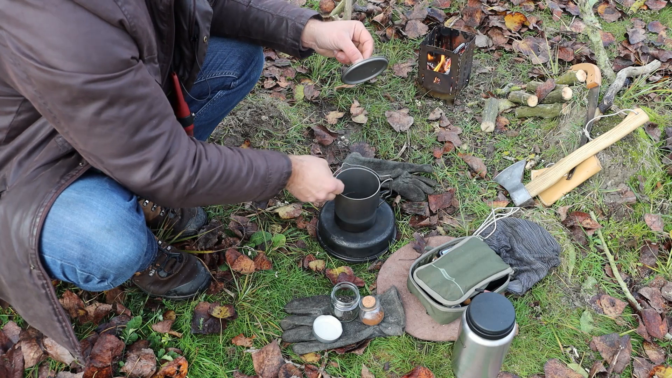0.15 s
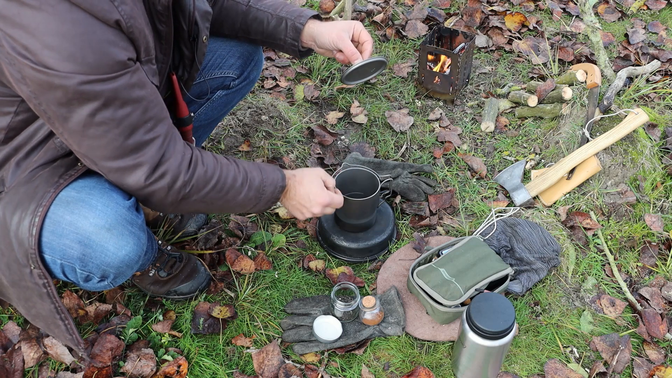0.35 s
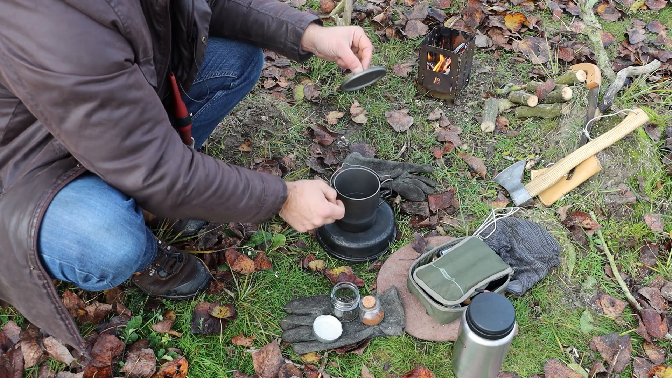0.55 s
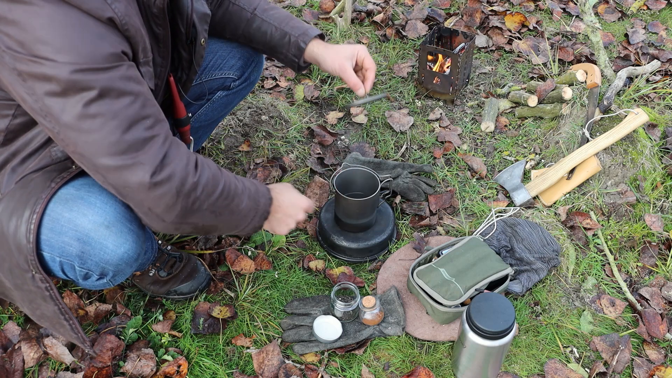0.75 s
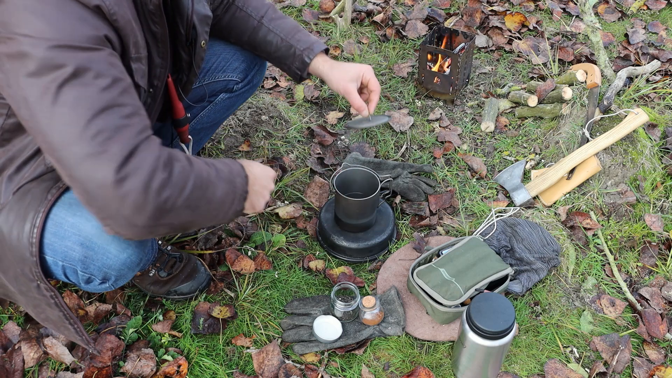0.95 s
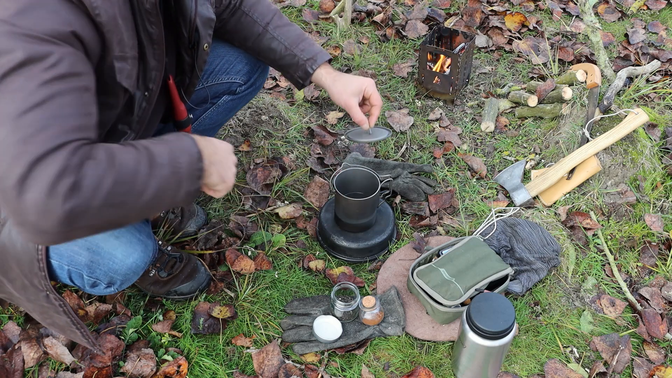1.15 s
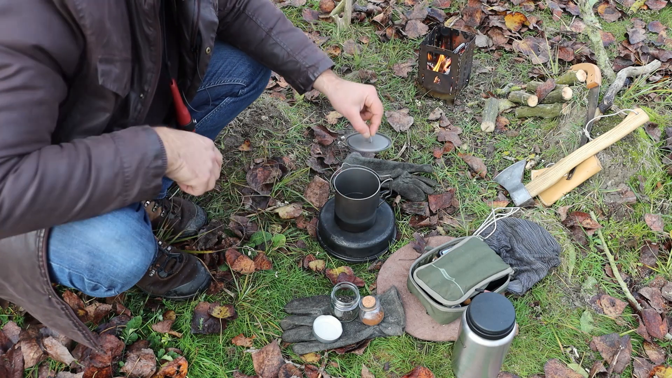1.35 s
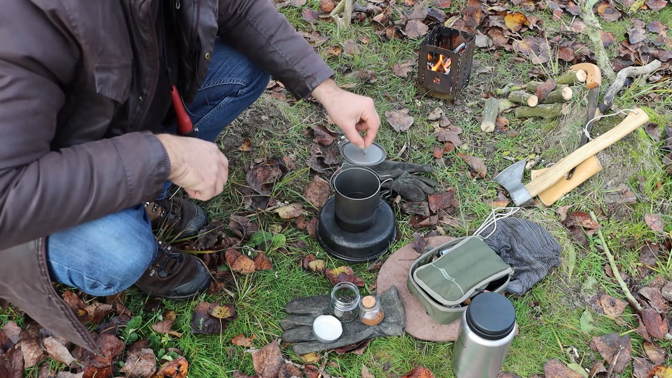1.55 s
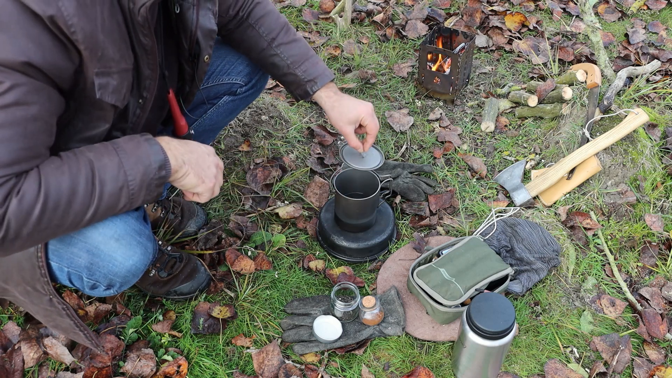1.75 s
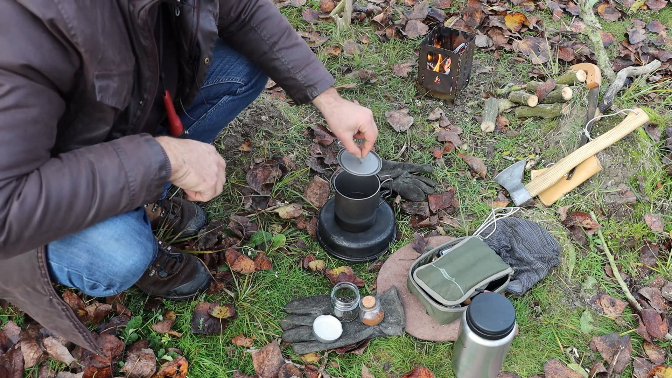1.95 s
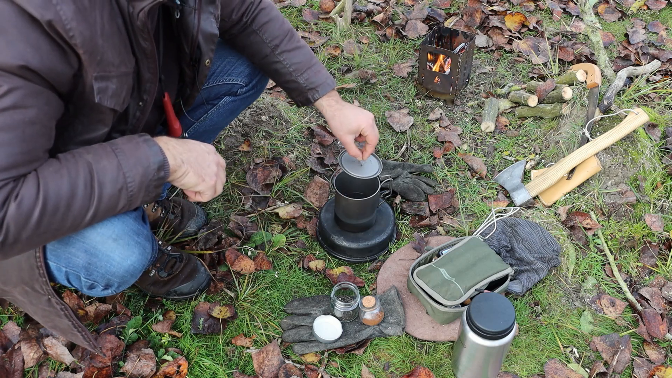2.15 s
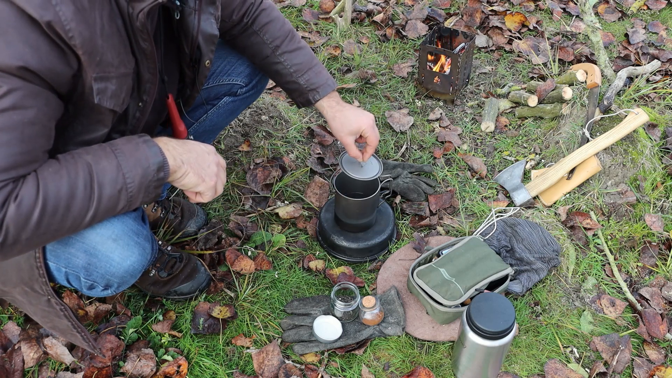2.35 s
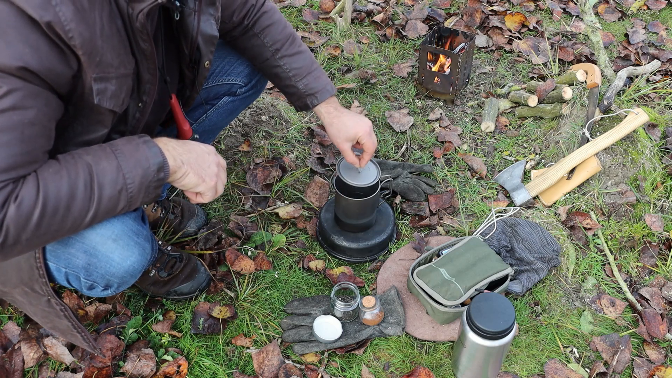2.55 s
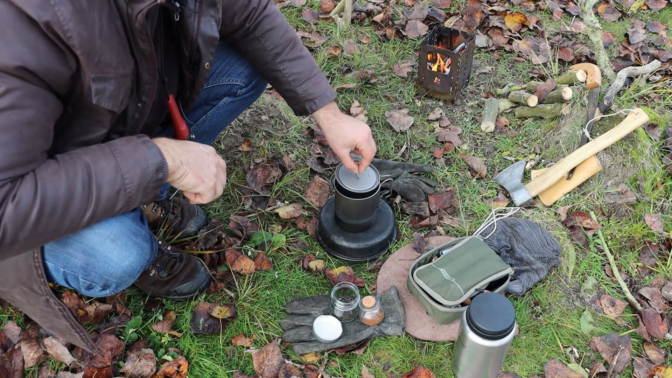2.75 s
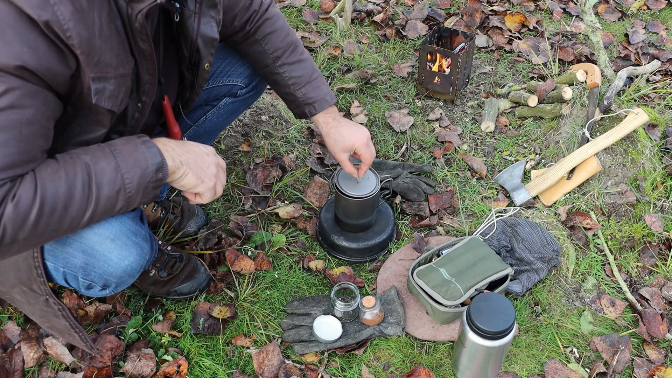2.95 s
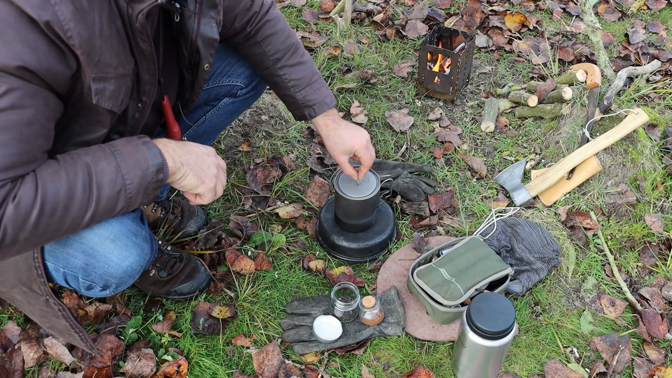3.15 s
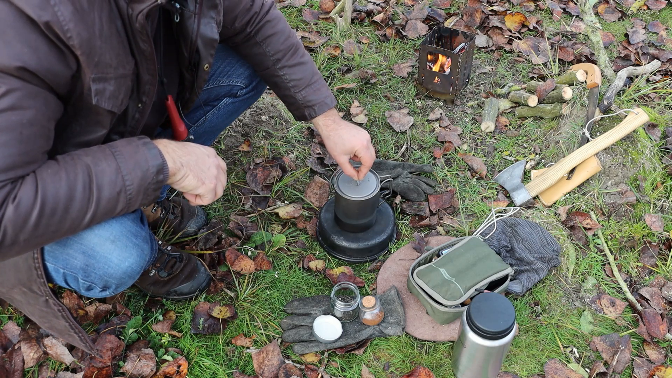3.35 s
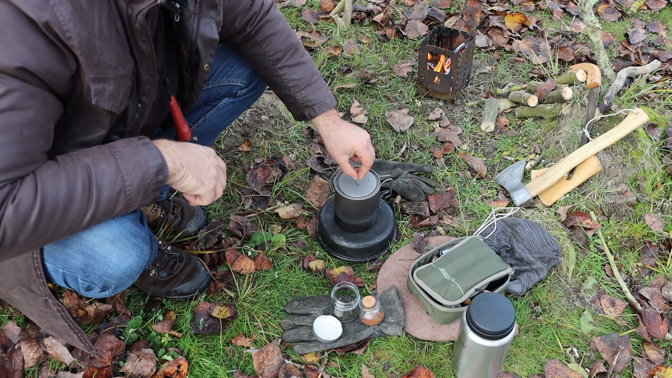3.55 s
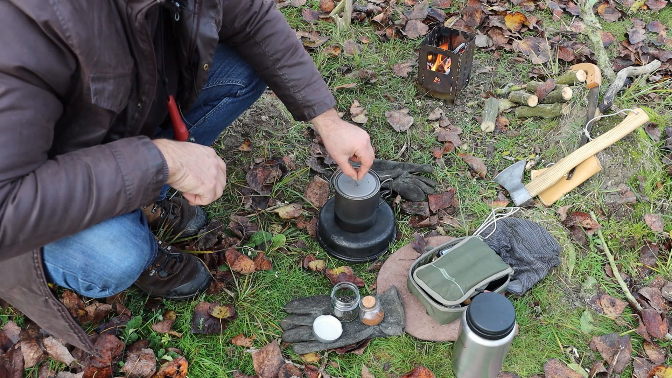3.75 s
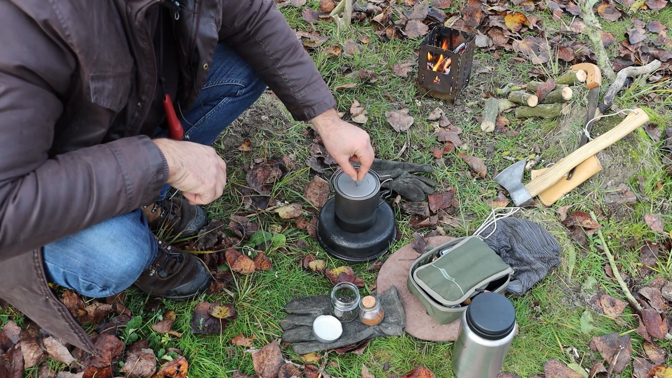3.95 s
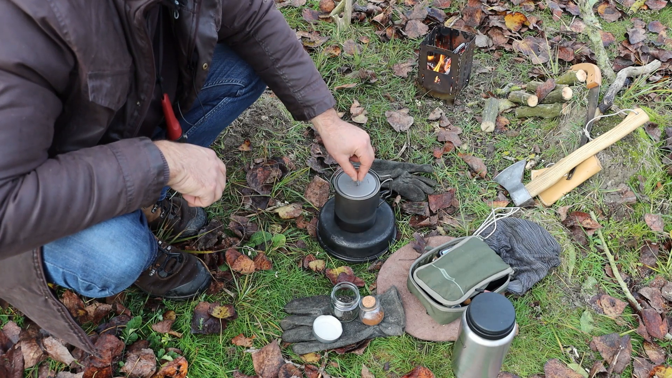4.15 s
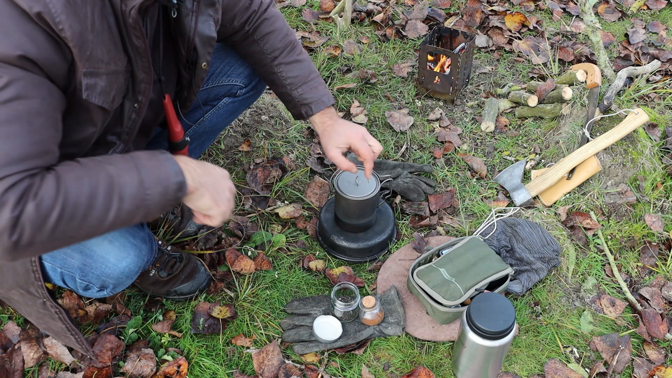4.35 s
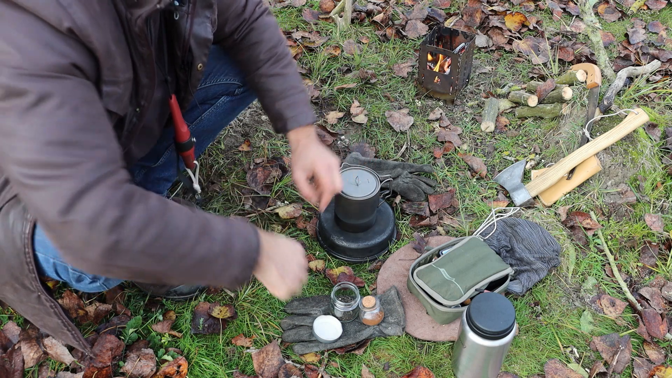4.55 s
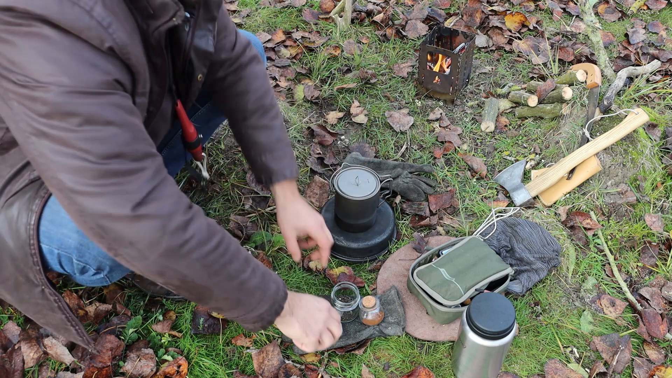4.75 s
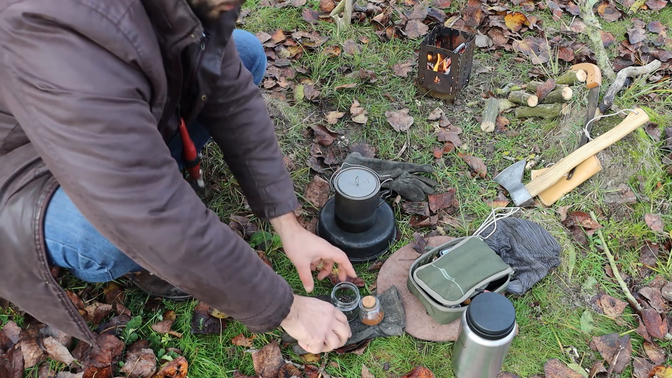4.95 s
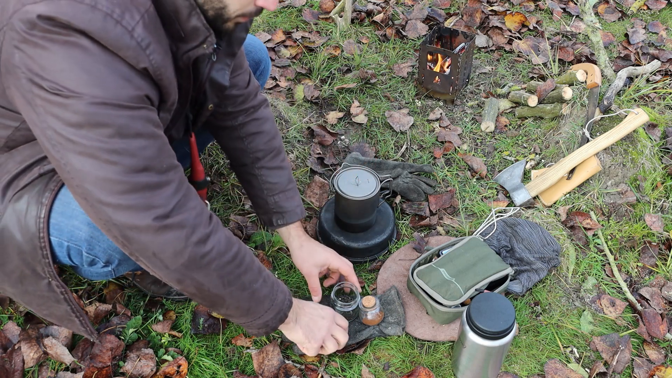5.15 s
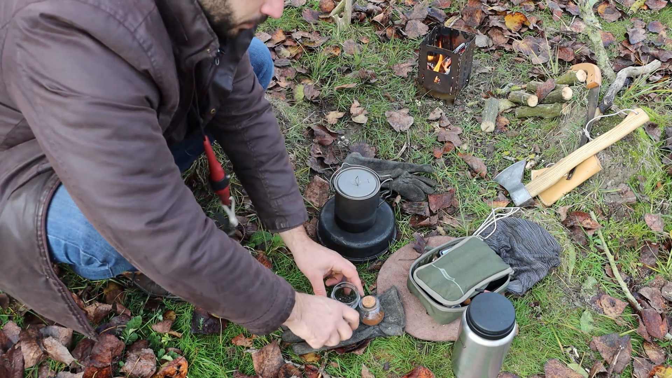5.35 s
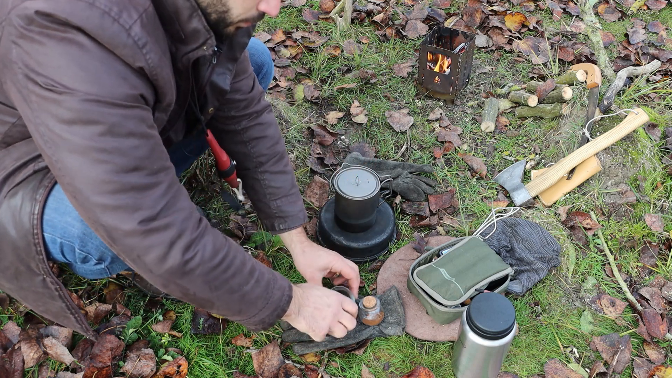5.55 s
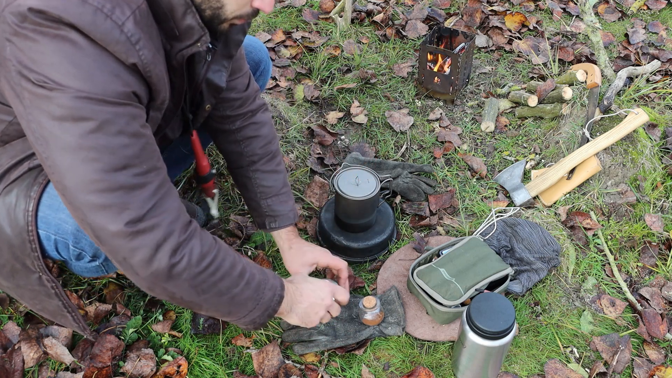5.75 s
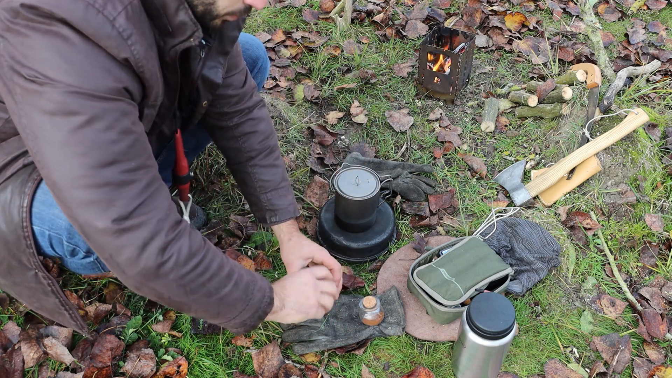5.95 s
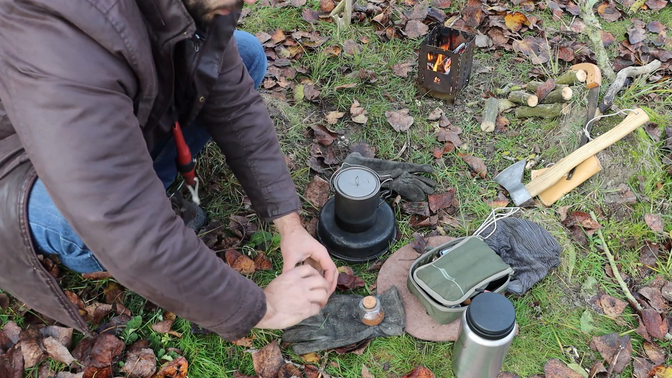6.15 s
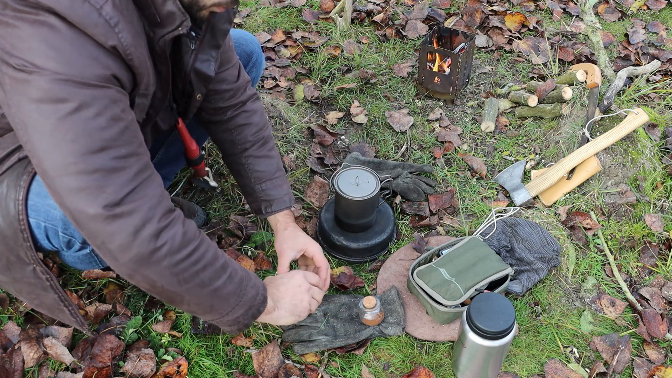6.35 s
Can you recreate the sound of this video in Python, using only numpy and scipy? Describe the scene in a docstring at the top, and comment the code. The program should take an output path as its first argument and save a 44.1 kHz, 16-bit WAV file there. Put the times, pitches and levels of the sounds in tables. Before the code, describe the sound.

Beside a small wood stove, a metal mug rattles briefly into place near the microphone. Leather-like sleeves rub softly, then there is a quiet gap before the metal lid rings and chatters on the rim in small groups. Sleeves swish again, with a soft cloth pat and a tiny fire tick. Finally a glass jar clinks sharply and its threaded cap turns with hollow, gritty scrapes and hard clicks. Faint birds and traffic remain far away.

```python
"""Mug, lid and jar by a wood stove

Outdoors by a small wood stove: near the microphone a thin metal mug is slid onto its stand, its lid is
fitted on the rim, then a glass jar is picked up and its cap twisted. Contacts are bursts of tiny bounces
that ring each object's modes; the turning thread is gritty noise through moving resonances.
Jacket sleeves swish as shaped noise, a bird ticks in pairs of falling tones, the fire snaps twice
as short bright bursts, and far traffic hums under it all as filtered noise."""
import sys
import numpy as np
from scipy import signal
from scipy.io import wavfile
from scipy.ndimage import uniform_filter1d

SR = 44100
rng = np.random.default_rng(int(sys.argv[2]) if len(sys.argv) > 2 else 0)


def materialize(psi):
    """Save the field psi as 16-bit PCM at rate SR to the path in sys.argv[1].

    A 1-D psi becomes a single channel; in a 2-D psi each row is a channel.
    """
    bounded = np.clip(np.atleast_2d(psi).T, -1, 1)
    quanta = np.round(bounded * 32767).astype(np.int16)
    wavfile.write(sys.argv[1], SR, quanta)


N = 282356  # length of the scene [samples]


def amp(db):
    """Amplitude factor for a level in dB."""
    return 10 ** (np.asarray(db) / 20)


def evened(x):
    """The signal scaled to an RMS of 1."""
    return x / np.sqrt(np.mean(x ** 2) + 1e-20)


def add(mix, s, sound):
    """Lay a sound into the mix from s seconds on."""
    part = mix[round(s * SR):][:len(sound)]
    part += sound[:len(part)]


def small(x, bass_hz):
    """Small objects radiate little bass."""
    return signal.sosfilt(signal.butter(4, bass_hz, "high", fs=SR, output="sos"), x)


def resonate(x, hz, width):
    """A resonance of gain 1 that follows the curve hz: shift it to 0 Hz, smooth, shift back."""
    turn = np.exp(2j * np.pi * np.cumsum(hz * np.ones(len(x))) / SR)
    r = np.exp(-np.pi * width / SR)
    return 2 * (turn * signal.lfilter([1 - r], [1, -r], x / turn)).real


def noise(points, tilt_db, patchy_db):
    """Random short-time spectra of unit power with drifting patches; tilt_db turns them about 2 kHz."""
    frames, hz = N // 128 + 5, np.fft.rfftfreq(512, 1 / SR) + 1
    a, b, patches = rng.standard_normal((frames, 257, 3)).T
    patches = uniform_filter1d(patches, size=6, axis=0)  # smooth over frequency
    patches = evened(uniform_filter1d(patches, size=10, axis=1))  # and over time
    f, db = np.transpose(points)
    tilt_db = np.interp(np.arange(frames) * 128, np.arange(N), tilt_db * np.ones(N))
    octaves = np.log2(hz / 2000).clip(-2)
    shape = amp(np.interp(np.log(hz), np.log(f), db)[:, None] + octaves[:, None] * tilt_db)
    shape /= np.linalg.norm(shape, axis=0)
    spectra = (a + 1j * b) * shape * amp(patchy_db * patches)
    return evened(signal.istft(spectra, nperseg=512, noverlap=384)[1][:N])


def grit(count, uneven_db):
    """Noise made of many tiny slips, a few of them large."""
    slips = amp(uneven_db * np.minimum(rng.exponential(1, count), 5))
    return evened(slips * rng.standard_normal(count))


def strike(modes_at, blows, spot_db, bass_hz, reach=4, detune=0, uneven_db=1.3, slide_s=0.013):
    """Each contact is a click and a swell of tiny bounces that ring the modes; its spot shifts their balance."""
    build_cycles = 0.51  # time constant of each mode's build-up, in its own cycles
    t, out = np.arange(10000) / SR, np.zeros(N)
    for s, peak_db, hard_db, length, *grip_hz in blows:
        hz, width, db = np.transpose(modes_at(s))[:, :, None]
        spot, bend = rng.standard_normal((2, len(hz), 1))
        hz = hz * (1 + detune * bend)  # the grip bends a thin wall
        # a hard contact brightens up to reach octaves above 1 kHz
        octaves = np.minimum(np.log2(hz / 1000), reach if hard_db > 0 else np.inf)
        strength = width * amp(db + hard_db * octaves + spot_db * spot)
        decay = np.exp(-np.pi * (width + abs(sum(grip_hz))) * t)
        rings = strength * decay * np.sin(2 * np.pi * hz * t)
        rings *= 1 - np.exp(-hz * t / build_cycles)
        ring = rings[::2].sum(0) - rings[1::2].sum(0)  # neighbouring modes start in opposite sense
        u = t / max(length, 1e-4)
        bounces = 0.1 * grit(len(t), uneven_db) * u * np.exp(1 - u)
        bounces[0] = np.exp(-length / slide_s)  # a long slide starts softly
        sound = small(signal.fftconvolve(bounces, ring), bass_hz)
        add(out, s, amp(peak_db) * sound / abs(sound).max())
    return out


# Spectrum of the far traffic and air: (frequency [Hz], relative power per Hz [dB])
AIR_SPECTRUM = [(20, -24), (120, -1.5), (205, -12), (322, -5.5), (960, -9), (1940, -29.5), (15000, -27.5),
                (16300, -58)]
# The low hum under it: (time [s], RMS level [dB])
HUM_LEVEL = [(0, -59.5), (2.1, -61), (6.4, -64.5)]


def background():
    """Far traffic and air as patchy noise, with a low hum that wavers: noise in a narrow resonance."""
    air = amp(-52) * noise(AIR_SPECTRUM, 0, patchy_db=2.5)
    hum = evened(resonate(rng.standard_normal(N), 109.2, 30.0))
    return air + hum * amp(np.interp(np.arange(N) / SR, *np.transpose(HUM_LEVEL)))


# Pairs of bird ticks, before the echoes: (time of the first [s], peak level [dB], gap to the second [s])
BIRD_TICKS = [(0.959, -44, 0.042), (1.768, -45.5, 0.043), (2.927, -43, 0.033), (3.728, -43, 0.039),
              (4.894, -46, 0.039), (5.124, -45, 0.047)]


def bird():
    """Each note drops steeply in pitch, the second over a narrower range; the trunks return close echoes."""
    out, u = np.zeros(N), np.linspace(0, 1, 400)
    for s, peak_db, gap in BIRD_TICKS:
        for start, top_hz, end_hz in (s, 8200.0, 5000.0), (s + gap, 7000.0, 4700.0):
            hz = top_hz + (end_hz - top_hz) * u
            swell = np.sin(np.pi * u) ** 0.74
            add(out, start, amp(peak_db) * swell * np.sin(2 * np.pi * np.cumsum(hz) / SR))
    t = np.arange(4000) / SR
    sparse = (rng.random(4000) < 0.1) * rng.standard_normal(4000)
    echoes = 0.24 * sparse * np.exp(-t / 0.009)
    echoes[[0, 230]] = 1, 0.45  # the direct note, then one clear echo 5 ms later
    return signal.oaconvolve(out, echoes)[:N]


# Snaps of the stove fire: (time [s], peak level [dB], decay time [s], bass cutoff [Hz])
FIRE_SNAPS = [(0.403, -14, 0.0012, 400), (4.631, -24.5, 0.001, 5000)]


def fire():
    """Pockets in the wood burst: a click and a short decaying burst of noise."""
    out, t = np.zeros(N), np.arange(400) / SR
    for s, peak_db, decay_s, low_hz in FIRE_SNAPS:
        burst = 0.2 * rng.standard_normal(400) * np.exp(-t / decay_s)
        burst[0] = 1
        burst = small(uniform_filter1d(burst, size=3, origin=1), low_hz)
        add(out, s, amp(peak_db) * burst / abs(burst).max())
    return out


# Spectrum of cloth on cloth, before the brightness tilt: (frequency [Hz], relative power per Hz [dB])
CLOTH_SPECTRUM = [(100, -14.5), (662, 0.5), (872, 1.5), (1230, -2), (3500, -15), (4300, -22.5),
                  (13800, -51), (16000, -60)]
# Sleeve strokes: (time when fastest [s], rise [s], fall [s], level before flicker [dB],
# brightness [dB per octave], hollow of the fold when fastest [Hz])
SLEEVE_STROKES = [(.83, 0.48, 0.44, -30.5, 5.5, 940), (1.17, 0.19, 0.4, -42, 7.5, 950),
                  (1.392, 0.36, 0.2, -37, 7, 1000), (4.491, 0.44, 0.68, -34.5, 7.5, 850),
                  (4.74, 0.51, 0.76, -34, 4, 1200)]
# The jacket's faint rustle between strokes: (time [s], level before flicker [dB])
REST_RUSTLE = [(0, -52.5), (1.5, -51), (2.3, -59.5), (2.95, -57), (3.9, -49.5), (4.2, -58.5), (5.05, -49.5),
               (5.4, -55), (6.4, -55.5)]


def sleeves():
    """Cloth rubs on cloth; the fold between arm and chest adds a hollow band that differs by reach."""
    drop_db = 83  # below the top at either end of a stroke
    sag_hz_per_s = 700  # the fold opens and its hollow sinks through a stroke
    rest_bright_db, rest_hollow_hz = 7.5, 960  # [dB per octave], [Hz]
    t = np.arange(N) / SR
    s, rise, fall, top_db, bright_db, hollow_hz = np.transpose(SLEEVE_STROKES)[:, :, None]
    strokes_db = top_db - drop_db * ((t - s) / np.where(t < s, rise, fall)) ** 2
    rest_db = np.interp(t, *np.transpose(REST_RUSTLE))
    power = amp(2 * np.vstack([strokes_db.clip(-200), rest_db]))
    share = power / power.sum(0)  # the strongest rub sets brightness and hollow
    rub = noise(CLOTH_SPECTRUM, np.append(bright_db, rest_bright_db) @ share, patchy_db=1.5)
    sinking_hz = hollow_hz - sag_hz_per_s * (t - s).clip(-0.1, fall)
    fold_hz = (share * np.vstack([sinking_hz, np.full(N, rest_hollow_hz)])).sum(0)
    rub = evened(rub + 1.23 * resonate(rub, fold_hz, 155.0))
    flicker = evened(uniform_filter1d(rng.standard_normal(N), size=200))
    return rub * np.sqrt(power.sum(0)) * amp(1.1 * flicker)


# Small pats of cloth: (time [s], top of the envelope [dB], tone [Hz])
CLOTH_PATS = [(1.297, -39, 350), (4.58, -29.5, 1770)]


def pats():
    """A fold of the jacket slaps shut with a soft, short tone."""
    out, t = np.zeros(N), np.arange(3000) / SR
    u = t / 0.0045  # the envelope peaks after 4.5 ms
    for s, peak_db, hz in CLOTH_PATS:
        add(out, s, amp(peak_db) * u * np.exp(1 - u) * np.sin(2 * np.pi * hz * t))
    return out


# Modes of the thin metal mug, the wide ones dense and merged; strength is before hardness and spot,
# frequency before the bend of the wall: (frequency [Hz], width [Hz], strength [dB])
MUG_MODES = [(278, 180, -9), (534, 113, -2), (790, 35, 4), (1010, 120, -1), (1270, 89, 0), (2042, 84, 4.5),
             (2585, 55, 8.5), (2982, 25, 7.5), (3570, 39, 4.5), (5030, 220, 5.5), (5940, 110, 0.5),
             (10100, 45, -8), (12700, 33, -17), (14800, 83, -14), (4070, 3700, -9), (11800, 5700, -11.5)]
# Mug against its stand: (time [s], peak level [dB], hardness [dB per octave], chatter time [s])
MUG_CONTACTS = [(0.093, -28.5, 6, 0.0049), (0.1147, -17.5, 6, 0.011), (0.153, -23, -10, 0.0065),
                (0.1692, -18.5, 13, 0.021), (0.175, -23, -10, 0.0052), (0.199, -13.5, -2.5, 0.01),
                (0.237, -18.5, -7.5, 0.015), (0.2543, -11, -8, 0.003), (0.3314, -19.5, -8.5, 0.0027),
                (.345, -26, -10.5, 0.0073), (0.411, -34.5, -13.5, 0.041)]


def mug():
    """The mug knocks and slides onto its stand; its thin wall bends, so pitches vary by contact."""
    return strike(lambda at: MUG_MODES, MUG_CONTACTS, spot_db=2.5, bass_hz=280, detune=0.0208, uneven_db=2.5)


# Steady modes of the lid, before hardness and spot: (frequency [Hz], width [Hz], strength [dB])
LID_MODES = [(316, 140, -5), (570, 78, -8), (1026, 215, 0.5), (2080, 21, -4), (11400, 6700, -33.5),
             (4900, 26, -13), (5234, 63, -3.5), (6140, 27, -6), (7870, 17, -12), (2530, 2200, -8)]
# Rings that change as the lid seats: (frequency [Hz], width [Hz], tilted strength [dB], seated strength [dB])
LID_SEATING_RINGS = [(830, 70, 5, -6), (1290, 22, -4, 0), (3055, 29, 9, 8), (3547, 28, 15, -4),
                     (9105, 5, -24, -10), (1486, 9, 6, -4), (2196, 4.5, -6, 8), (2519, 7, 0, -2),
                     (2760, 8, 3, 3), (3345, 7, 5, -14), (3591, 4, -14, 9), (3671, 7, 7, -12),
                     (5098, 2, 10, -18)]


def lid_modes(at):
    """The lid's modes at one moment of its way down onto the rim."""
    tilted_s, seated_s = 3.05, 3.2
    seating = [(hz, width, np.interp(at, [tilted_s, seated_s], db)) for hz, width, *db in LID_SEATING_RINGS]
    return LID_MODES + seating


# Lid against the rim: (time [s], peak level [dB], hardness [dB per octave], chatter time [s],
# damping added by the rim or fingers [Hz])
LID_CONTACTS = [(3.003, -13.5, -1.5, 0.00083, 0.43), (3.008, -25, -3.5, 0.0026, 0.75),
                (3.1152, -19, -2.5, 0.0025, 5.3), (3.124, -24.5, -3.5, 0.013, 6.2),
                (3.181, -26.5, -3.5, 0.004, 19), (3.2084, -23.5, -5, 0.0039, 11),
                (3.228, -27, -2, 0.0051, 24), (3.517, -25.5, -4.5, 0.0036, 19),
                (3.536, -27, -5, 0.0029, 19), (3.58, -25.5, -2.5, 0.0098, 39), (3.653, -31, -5, 0.0019, 35),
                (3.669, -29, -5, 0.015, 59), (3.693, -26, 3, 0.0072, 9.5), (3.7816, -17.5, -2, 0.0015, 6.6),
                (3.7954, -13.5, 2, 0.00041, 16), (3.799, -15.5, -1.5, 0.0056, 180),
                (3.823, -21.5, -6, 0.011, 27), (3.841, -12, 1, 0.0067, 35), (3.856, -16, -2.5, 0.001, 1),
                (4.277, -35, 3, 0.0014, 9.2), (4.306, -25.5, -3, 0.0022, 11)]


def lid():
    """The lid taps and settles on the rim, which changes the balance of its rings."""
    return strike(lid_modes, LID_CONTACTS, spot_db=2.27, bass_hz=283, uneven_db=3.5, slide_s=0.0064)


# Modes of the glass body, before hardness and spot: (frequency [Hz], width [Hz], strength [dB])
GLASS_MODES = [(790, 440, -11.5), (1150, 78, 5), (1940, 78, 1.5), (2253, 76, 2.5), (2820, 75, 1.5),
               (3535, 88, -0.5), (3850, 59, -12.5), (14860, 45, -29), (5550, 410, -21.5), (9900, 5300, -36)]
# Clinks of the jar: (time [s], peak level [dB], hardness [dB per octave], chatter time [s],
# damping added by the fingers [Hz], strength of the long ring [dB])
JAR_CLINKS = [(5.355, -23, 4, 0.00074, 1, 16.5), (5.492, -6, -1, 0.00098, 3.3, 3.5),
              (5.547, -30, -3, 0.0011, 110, -7), (5.568, -37, 45, 0.0023, 1., -30),
              (6.121, -14.5, 7.5, 0.0031, 140, 15)]


def glass_modes(at):
    """The glass body and its one long ring, which each clink wakes by its own amount."""
    clinks = np.transpose(JAR_CLINKS)
    return GLASS_MODES + [(4828, 15, np.interp(at, clinks[0], clinks[-1]))]


def glass_clinks():
    """The glass jar clinks in the hand, its modes damped by the fingers."""
    return strike(glass_modes, np.array(JAR_CLINKS)[:, :-1], spot_db=1.5, bass_hz=480)


JAR_BASS_HZ = 329  # below this the capped jar is too small to radiate
CAVITY_WIDTH_HZ = 55  # for knocks; the scrape uses wider resonances
# Modes of the cap, widths for knocks, before hardness and spot: (frequency [Hz], width [Hz], strength [dB])
CAP_MODES = [(1036, 112, 8.5), (1320, 1080, -16.5), (2450, 240, -7.5), (4030, 950, -28), (4930, 100, -18),
             (3300, 1320, -21), (11700, 2800, -34.5)]
# Air in the jar, sinking overall as the cap closes the gap: (time [s], frequency [Hz], strength [dB])
JAR_CAVITY = [(5.69, 885, 16.5), (5.73, 820, 9), (5.78, 655, -2), (5.93, 635, 16), (6.01, 545, -10),
              (6.07, 595, 19.5), (6.15, 541, 0), (6.24, 527, 1.5), (6.262, 367, -4)]
# Cap against the jar: (time [s], peak level [dB], hardness [dB per octave], chatter time [s],
# pitch of the click where the thread catches [Hz])
CAP_CONTACTS = [(5.6284, -28.5, 20, 0.0012, 2160), (5.642, -27.5, 22, 0.00082, 2160),
                (5.693, -15, 20, 0.0037, 1480), (5.7327, -10.5, 5, 0.0011, 5050),
                (5.7493, -12.5, 27, 0.0028, 2670), (5.7563, -9, 1, 0.0011, 2500),
                (5.766, -11.5, -1.5, 0.0012, 5770), (5.786, 1.5, -1.5, 0.00054, 4270),
                (5.816, -23, -3, 0.0019, 2570), (5.912, -28.5, 0, 0.0019, 2500),
                (5.9316, -7.5, -2.5, 0.0014, 5500), (5.9492, -22, 5, 0.0011, 4340),
                (5.956, -26, 10, 0.00088, 4300), (6.0222, -15, -7, 0.0017, 3160),
                (6.0655, -23.5, 28, 0.0024, 2440), (6.087, -12, 2, 0.00063, 3080),
                (6.114, -1, -0.5, 0.0005, 2340), (6.1393, -4.5, -1.5, 0.000083, 2780),
                (6.156, -22, -2, 0.00058, 2300), (6.179, -29, -4, 0.00024, 2410),
                (6.2228, -24.5, -15, 0.00081, 2400), (6.263, -3, -1, 0.0014, 4230),
                (6.269, -14.5, 8, 0.0022, 2860)]


def cap_knocks():
    """Knocks of the cap ring its modes, the air in the jar and a click where the thread catches."""
    s, cavity_hz, cavity_db = np.transpose(JAR_CAVITY)
    knocks = np.array(CAP_CONTACTS)

    def modes_at(at):
        """The cavity and thread click at this moment, then the cap."""
        cavity = np.interp(at, s, cavity_hz), CAVITY_WIDTH_HZ, np.interp(at, s, cavity_db)
        click = np.interp(at, knocks[:, 0], knocks[:, -1]), 210, -6.5
        return [cavity, click] + CAP_MODES

    return strike(modes_at, knocks[:, :-1], spot_db=1.75, bass_hz=JAR_BASS_HZ, reach=0.93, slide_s=0.0043)


def turn(start, length, scrape_db, change_db, hard_db):
    """The thread scrapes in jerks and rings the cap and the air under it."""
    grip_s, let_go_db_per_s = 0.016, 752
    bright_reach = 2.1  # octaves above 1 kHz up to which hardness tilts the scrape
    t = np.arange(0, length + 0.08, 1 / SR)
    s, *columns = np.transpose(JAR_CAVITY)
    cavity_hz, cavity_db = (np.interp(start + t, s, c) for c in columns)
    level_db = scrape_db + change_db * np.minimum(t / length, 1)
    level_db -= let_go_db_per_s * np.maximum(t - length, 0)
    jerks = evened(uniform_filter1d(rng.standard_normal(len(t)), size=150))
    drive = grit(len(t), 2.4) * amp(level_db + 4.2 * jerks) * np.minimum(t / grip_s, 1) ** 2
    modes = [(cavity_hz, CAVITY_WIDTH_HZ, cavity_db)] + CAP_MODES
    gains = [amp(db + hard_db * np.minimum(np.log2(hz / 1000), bright_reach)) for hz, _, db in modes]
    # even out the power that the modes together let through
    drive /= np.sqrt(sum(g ** 2 * width for g, (_, width, _) in zip(gains, modes)) * 2 * np.pi / SR)
    out = np.zeros(len(t))
    for gain, (hz, width, _) in zip(gains, modes):
        once = resonate(gain * drive, hz, 2.14 * width)
        out += resonate(once, hz, 2.13 * width)
    return small(out, JAR_BASS_HZ)


# Jerks of the cap on its thread: (start [s], length [s], scrape level before jerks and filters [dB],
# change over the turn [dB], hardness [dB per octave])
CAP_TURNS = [(5.696, 0.075, -35, 7.5, 3.5), (5.909, 0.049, -24, -2.5, -0.5), (5.961, 0.067, -31, 0.5, -5.5),
             (6.02, 0.095, -26, -7, 0), (6.224, 0.037, -28, 6, -7), (6.272, 0.035, -44, 3.5, 14)]


def thread_scrape():
    """The cap is turned in jerks, each one a scrape of the thread."""
    out = np.zeros(N)
    for start, *settings in CAP_TURNS:
        add(out, start, turn(start, *settings))
    return out


def scene():
    """From the far traffic to the jar in the hands, summed to one channel."""
    surroundings = background() + bird() + fire()
    jacket = sleeves() + pats()
    jar = glass_clinks() + cap_knocks() + thread_scrape()
    return (surroundings + jacket + mug() + lid() + jar)[None]


def record(dry):
    """The microphone signal: peaks clip at full scale, then a low-pass sets the band limit."""
    edge_hz = 16250
    band = signal.firwin(511, edge_hz, window=("kaiser", 9), fs=SR)
    return signal.oaconvolve(dry.clip(-1, 1), band[None], "same")


dry = scene()
out = record(dry)
materialize(out)
```